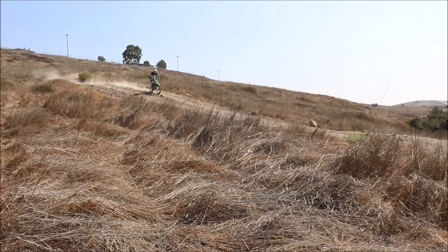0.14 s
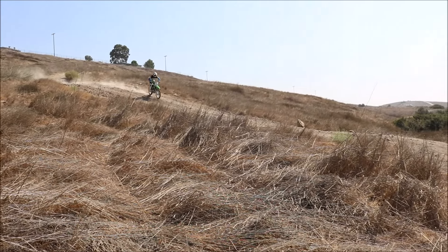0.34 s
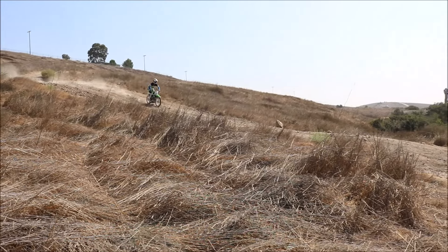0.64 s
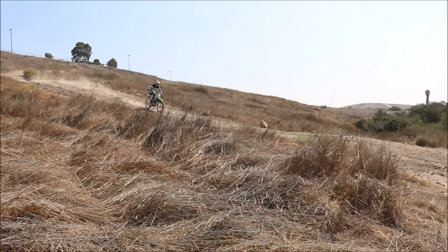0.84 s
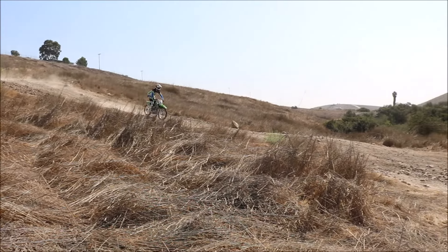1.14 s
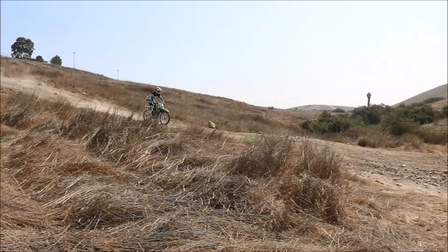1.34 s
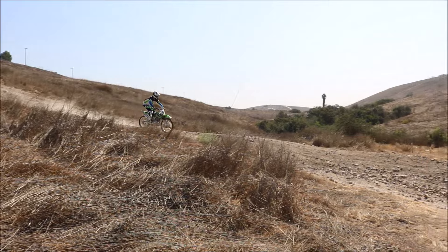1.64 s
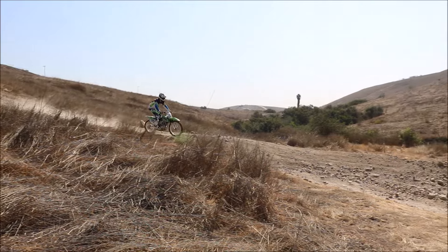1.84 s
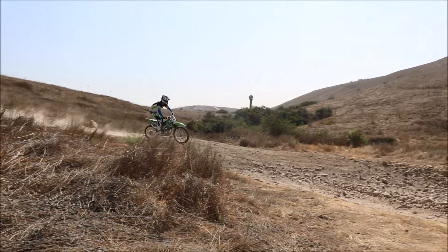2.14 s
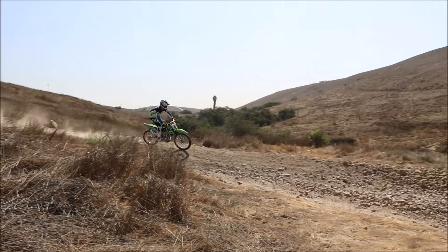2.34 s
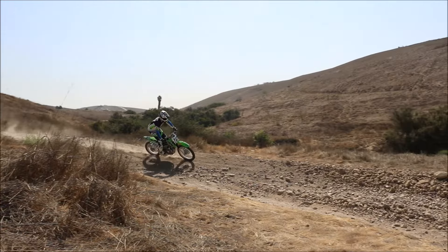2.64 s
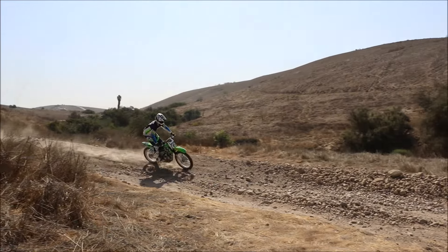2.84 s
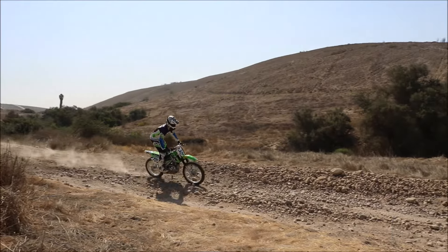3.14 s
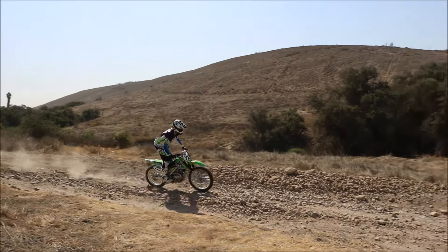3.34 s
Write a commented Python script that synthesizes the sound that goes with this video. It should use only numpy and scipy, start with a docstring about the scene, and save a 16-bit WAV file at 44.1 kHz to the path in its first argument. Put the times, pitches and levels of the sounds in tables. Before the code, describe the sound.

Motorbike engine coming down a dry open trail: droning far off, slowing into a lumpy popping burble with metallic clanks and stone spray, then a fuller throaty surge nearby; dry, centred, little background hiss.

```python
"""Trail bike down a stony slope

A single-cylinder bike rides down towards the listener: throttle open, shut with pops in the pipe, then open again.
Open exhaust is a stack of multiples of the firing rate; shut exhaust is uneven pulses ringing a pipe filter.
Clatter, gravel and treble are coloured noise that swells with each firing; stone sprays are short noise bursts.
Pops, clanks and chain ticks are damped sines, cracks are single snaps; a low rumble and a side hiss lie beneath."""
import sys
import numpy as np
from scipy import signal
from scipy.fft import rfft, irfft, next_fast_len
from scipy.io import wavfile
from scipy.ndimage import uniform_filter1d, map_coordinates

SR = 44100
rng = np.random.default_rng(int(sys.argv[2]) if len(sys.argv) > 2 else 0)


def wrap_up_sound(samples):
    """Save the sound to the file named by the first command line argument, as 16-bit audio."""
    columns = np.atleast_2d(samples).T
    # keep every value between -1 and 1, then stretch to whole-number steps
    tamed = np.clip(columns, -1, 1)
    steps = np.round(tamed * 32767).astype(np.int16)
    wavfile.write(sys.argv[1], SR, steps)


N = 154350  # length [samples]

# Hiss that differs between the channels, bass included: (frequency [Hz], level [dB])
HISS_COLOUR = [(12, -54), (20, -21), (48, -14), (91, -36), (158, -26), (285, -64), (4420, -65), (4810, -61),
               (8410, -42), (16000, -34)]
HISS_DB = -11  # over the treble curve
# Low rumble: (frequency [Hz], level [dB])
RUMBLE_COLOUR = [(12, -77), (20, -25), (32, -53), (59, -23.5), (80, -36.5), (100, -17), (180, -120)]
RUMBLE_DB = -45
# Rolling layers before bumps and beat:
# (time [s], clatter [dB], gravel [dB], treble [dB], top treble [dB])
ROLLING_LEVELS = [(0.0, -37.5, -58, -65, -74), (0.25, -38, -51.5, -62.5, -81),
                  (0.5, -38.5, -55, -61.5, -61), (0.61, -37.5, -48, -60.5, -70),
                  (0.75, -36.5, -50.5, -60, -76), (0.94, -37.5, -55.5, -62, -68),
                  (1.28, -38, -49.5, -61, -74), (1.68, -35.5, -49, -61, -65), (1.85, -34.5, -42, -55, -59),
                  (2.02, -37.5, -44, -57.5, -62), (2.24, -34.5, -43.5, -60.5, -61),
                  (2.48, -33, -48, -59, -68), (2.83, -33.5, -47, -59, -63), (2.95, -34, -47.5, -54, -58),
                  (3.1, -31.5, -41.5, -52.5, -54), (3.21, -30, -42, -51.5, -57),
                  (3.5, -35, -41, -56.5, -55)]
# Top treble: (frequency [Hz], level [dB])
TOP_TREBLE_COLOUR = [(7060, -18), (12000, 3), (15100, -5), (15700, -3)]
# Treble rush: (frequency [Hz], level [dB])
TREBLE_COLOUR = [(3530, -46), (6000, 0), (6360, -6.5), (7330, -7.5), (10700, -8), (12000, -13),
                 (15600, -43), (22000, -120)]
# Cooling-fin resonances: (frequency [Hz], width before sharpening [Hz], relative level [dB])
FIN_MODES = [(8160, 85, 12), (10770, 130, 5.5), (10700, 72, -11), (11940, 230, 4)]
# Tyres on gravel: (frequency [Hz], level [dB])
GRAVEL_COLOUR = [(1760, -16.5), (3000, 3), (3780, -5), (5010, -3), (5500, -3), (6260, -15.5), (7500, -27),
                 (9750, -42), (16500, -120)]
# Stones sprayed at the frame: (time [s], length scale [s], body level [dB], treble over body [dB])
STONE_SPRAYS = [(0.715, 0.014, -32, -5.5), (1.184, 0.043, -35, -28), (1.769, 0.027, -29, -7.5),
                (2.196, 0.0068, -24.5, -14), (2.618, 0.0089, -29, -16), (2.754, 0.015, -37.5, -1.5),
                (2.877, 0.019, -27.5, -2), (3.376, 0.01, -25.5, -8.5)]
# Spray body: (frequency [Hz], level [dB])
SPRAY_BODY_COLOUR = [(600, -10), (1500, 0.5), (3000, 2), (5000, -9.5), (7000, -27), (16000, -62)]
# Spray treble: (frequency [Hz], level [dB])
SPRAY_TREBLE_COLOUR = [(3000, -30), (5000, 0), (6500, -14), (10000, -18), (13000, -35), (16000, -47)]
# Metal clanks: (time [s], relative level [dB], frequency [Hz], 60 dB decay [s])
METAL_CLANKS = [(0.0413, -26, 1940, 0.02), (0.5871, -19, 2380, 0.019), (0.609, -18.5, 2240, 0.031),
                (0.7186, -20.5, 2880, 0.019), (0.7212, -24, 2340, 0.02), (1.2021, -11.5, 2730, 0.014),
                (1.2113, -14, 2493, 0.015), (1.2124, -31, 2730, 0.016), (1.2244, -24, 2230, 0.036),
                (1.3693, -21, 1710, 0.031), (1.4835, -23, 2140, 0.012), (1.6745, -21, 2120, 0.026),
                (1.7699, -13, 1850, 0.019), (1.7844, -20, 1660, 0.024), (1.8158, -15, 2220, 0.014),
                (1.8961, -17, 2210, 0.015), (1.9644, -19.5, 1747, 0.023), (2.0477, -21, 1382, 0.019),
                (2.1979, -7, 1613, 0.02), (2.2383, -22, 1780, 0.023), (2.2752, -6, 2300, 0.007),
                (2.3735, -21, 2640, 0.018), (2.4738, -24, 1310, 0.02), (2.4864, -17, 1740, 0.023),
                (2.5094, -14, 1690, 0.018), (2.5566, -17, 1520, 0.02), (2.5732, -11, 1270, 0.013),
                (2.5805, -12, 2440, 0.013), (2.6625, -18.5, 1950, 0.025), (2.7586, -11, 1734, 0.035),
                (2.921, -20, 1750, 0.02), (2.9711, -17.5, 1560, 0.026), (3.0101, -18, 1840, 0.04),
                (3.1303, -20, 1680, 0.018), (3.1587, -17.5, 1870, 0.022), (3.2086, -17, 1330, 0.019),
                (3.2311, -14, 2300, 0.015), (3.2705, -4, 2030, 0.0096), (3.2939, -16, 2122, 0.03),
                (3.3054, -18, 2220, 0.018), (3.3954, -28, 1950, 0.018), (3.4204, -18, 2330, 0.03)]
# Clatter, far with throttle open: (frequency [Hz], level [dB])
FAR_CLATTER_COLOUR = [(260, -38), (450, 2), (918, -6.5), (1100, -3.5), (1200, -5.5), (1930, -4), (2180, -9),
                      (2380, -2), (4500, -18.5), (5850, -54), (9900, -120)]
# Clatter, throttle shut: (frequency [Hz], level [dB])
SHUT_CLATTER_COLOUR = [(260, -21), (450, -2), (668, 1.5), (842, -8), (1060, -4), (1590, -6.5), (1910, -6.5),
                       (2210, -7), (4500, -22.5), (5850, -65), (9900, -120)]
# Clatter, near with throttle open: (frequency [Hz], level [dB])
NEAR_CLATTER_COLOUR = [(260, -29), (450, 3), (624, 3), (721, 4.5), (900, -3.5), (1170, 3), (1570, -3.5),
                       (2270, 0), (2830, -11.5), (3060, -13.5), (4500, -15.5), (5850, -48), (9900, -120)]
# Engine-casing resonances: (frequency [Hz], width before sharpening [Hz], relative level [dB])
CASING_MODES = [(1192, 59, -4.5), (1557, 62, 5.5), (2183, 41, 4.5), (1916, 97, -4), (2370, 63, 3.5),
                (2743, 90, -1.5), (3000, 90, -4.5), (3900, 100, -14)]
# Sharp snaps: (time [s], relative level [dB])
PRESSURE_CRACKS = [(.681, -16), (.7232, -15), (1.983, -16), (2.5727, -8), (2.5812, -9), (2.5847, -10),
                   (2.6085, -18), (2.973, -13)]
# Afterfire: (time [s], relative level [dB], frequency [Hz], 60 dB decay [s])
AFTERFIRE_POPS = [(0.593, -39, 1009, 0.019), (0.593, -19.5, 450, 0.04), (0.674, -36, 590, 0.022),
                  (0.68, -15, 557, 0.029), (0.7228, -25, 473, 0.056), (1.099, -23, 674, 0.024),
                  (1.294, -17, 573, 0.018), (1.356, -24, 522, 0.026), (1.503, -14.5, 480, 0.013),
                  (1.663, -22.5, 545, 0.033), (1.719, -26, 602, 0.045), (1.808, -19, 570, 0.018),
                  (1.836, -18, 646, 0.022), (1.877, -26, 1080, 0.023), (1.8975, -11, 493, 0.013),
                  (1.982, -16.5, 530, 0.025), (2.2, -27, 505, 0.027), (2.21, -16, 570, 0.02),
                  (2.299, -23, 580, 0.026), (2.315, -21.5, 578, 0.068), (2.3972, -14, 710, 0.022),
                  (2.432, -21.5, 760, 0.019), (2.496, -23, 688, 0.037), (2.509, -30, 626, 0.017),
                  (2.525, -26, 1036, 0.043), (2.565, -18, 840, 0.02), (2.6225, -21, 750, 0.029),
                  (2.63, -20, 690, 0.02), (2.637, -16.5, 673, 0.027), (2.755, -15, 525, 0.013),
                  (2.912, -14, 650, 0.013), (3.039, -20, 440, 0.035), (3.305, -23, 473, 0.028)]
# Uneven flow in the pipe: (frequency [Hz], level [dB])
BURBLE_COLOUR = [(60, -61), (140, -5.5), (200, -3), (350, -2), (450, -13), (700, -57.5)]
# Burble, rougher while shut: (time [s], level before wobble [dB])
BURBLE_LEVELS = [(0, -44), (.5, -44), (.7, -36), (1.1, -38), (1.6, -35), (2.1, -36), (2.33, -41),
                 (2.5, -36), (2.74, -36), (2.82, -40), (3.5, -36)]
# Firing and beat levels before the throttle trim:
# (time [s], firing rate [Hz], open-throttle beat [dB], shut-throttle beat [dB])
ENGINE_COURSE = [(0.0, 48.56, -40, -24), (0.18, 48.83, -35, -21.5), (0.36, 50.07, -32.5, -27),
                 (0.5, 49.15, -30, -27), (0.67, 44.76, -33.5, -31), (0.79, 46.12, -30, -30),
                 (1.03, 44.79, -27, -34.5), (1.14, 41.02, -32, -34), (1.25, 40.49, -30, -35.5),
                 (1.41, 41.53, -28, -31.5), (1.54, 39.28, -30, -29.5), (1.75, 35.78, -32.5, -22.5),
                 (1.96, 34.83, -30, -27), (2.07, 32.72, -32, -26.5), (2.15, 33.35, -31.5, -30.5),
                 (2.22, 33.12, -32, -32), (2.27, 29.96, -31, -32), (2.33, 29.86, -43, -33.5),
                 (2.4, 27.7, -28, -33), (2.5, 29.01, -35, -26), (2.61, 27.63, -41, -31.5),
                 (2.76, 27.32, -38, -30), (2.8, 27.62, -25, -25), (2.91, 36.51, -28.5, -50),
                 (2.95, 39.85, -26, -37), (3.02, 43.38, -26, -39), (3.1, 45.56, -24.5, -9.5),
                 (3.25, 45, -26, -18), (3.36, 42, -25, -40), (3.47, 44.6, -24.5, -30),
                 (3.5, 45.8, -24, -32)]
# Throttle trim on both beats: (time [s], open trim [dB], shut trim [dB])
THROTTLE_TRIM = [(0, 7.5, -9), (.5, -1, -2), (.7, -1.5, -0.5), (1.1, -4, 3.5), (1.6, -3, -4.5),
                 (2.1, -2.5, -0.5), (2.33, -4, 3), (2.5, 1, -1), (2.74, 6, 3.5), (2.8, 0.5, -9),
                 (2.86, 4.5, -14), (2.92, 5.5, -26), (3.05, 2, -13.5), (3.5, 1.5, -20)]
# Pipe resonance with the throttle shut: (frequency [Hz], level [dB])
SHUT_PIPE_COLOUR = [(30, -59), (70, -13), (100, -5.5), (120, 8), (140, -4.5), (170, -30), (210, -24),
                    (270, -14.5), (345, -8), (420, -39), (600, -15.5), (900, -59)]
# Open-throttle beat, far: (multiple of firing rate, level before wavering [dB])
FAR_MULTIPLES = [(1, -7), (2, -6), (3, 1.5), (4, -0.5), (5, -2), (6, -2), (7, -3.5), (8, -11.5), (9, -49)]
# Open-throttle beat, near: (multiple of firing rate, level before wavering [dB])
NEAR_MULTIPLES = [(1, -12), (2, 1), (3, -3), (4, -14.5), (5, -2), (6, -7), (7, -6.5), (8, -5.5), (9, -8),
                  (10, -21), (11, -12.5), (12, -31), (13, -24), (15, -21), (16, -22)]
# What softens clanks, pops and cracks: (frequency [Hz], gain [dB])
KNOCK_COLOUR = [(20, 5.5), (4000, 0), (7000, -20), (16000, -29)]

NEAR_S, NEARING_S = 2.55, 0.24  # middle and time constant of the far-to-near change [s]
SHUT_S, OPEN_S, TWIST_S = 0.63, 2.96, 0.025  # throttle shuts, reopens, time constant of a twist [s]
TICKS_PER_S = 160  # chain ticks
RASP_DB, RASP_S = -5, 0.012  # engine shake: level over the clatter curve, decay constant [s]
CRACK_S = 0.00018  # time constant of a snap [s]
FIRING_S = 2.95  # one firing lands here [s]
JITTER_CYCLES, SCATTER_DB = 0.008, 1.5  # shut-throttle spread of timing and size
RING_LEAD_S = 0.005  # shut throttle: the ring in the pipe builds ahead of the beat [s]
BASS_HZ = 50.5  # the pipe's mouth radiates little below this
FAR_BASS_HZ = 82  # the far beat loses its bass below this
# The silencer holds back the multiples between its resonance and its notch
SILENCER_HZ, SILENCER_WIDE_HZ, NOTCH_HZ, NOTCH_WIDE_HZ = 115, 40, 165, 30
SUCK_RAD = 1.0  # extra lag of every multiple: a dip comes before each peak
TOP_HZ = 15830  # band limit of the output


def amp(db):
    """dB to gain."""
    return 10 ** (np.asarray(db) / 20)


def unit(x):
    """Scaled to rms 1."""
    return x / np.sqrt(np.mean(x ** 2) + 1e-20)


def curves(rows):
    """One value per sample for each column after the time."""
    s, *cols = np.transpose(rows)
    return [np.interp(np.arange(N) / SR, s, c) for c in cols]


def wobble(rate):
    """A smooth random curve, rate knots a second."""
    knots = rng.standard_normal(int(N * rate / SR) + 4)
    return map_coordinates(knots, [np.arange(N) * rate / SR])


def colour(x, points):
    """Causal minimum-phase filter through the (frequency [Hz], level [dB]) points."""
    m = 2 * next_fast_len(len(x) // 2 + SR // 4)
    f, db = np.transpose(points)
    bins = np.fft.rfftfreq(m, 1 / SR)
    gain = amp(np.interp(np.log(bins + 1), np.log(f + 1), db))
    # folding the cepstrum makes the response causal
    cepstrum = irfft(np.log(gain + 1e-6), m)
    cepstrum[1:m // 2] *= 2
    cepstrum[m // 2 + 1:] = 0
    return irfft(rfft(x, m) * np.exp(rfft(cepstrum)), m)[:len(x)]


def noise(points):
    """Coloured noise of rms 1."""
    return unit(colour(rng.standard_normal(N), points))


def patchy(points, patchy_db):
    """Coloured noise of rms 1 with random gain patches across time and frequency."""
    z = signal.stft(noise(points), nperseg=512)[2]
    field = uniform_filter1d(rng.standard_normal(z.shape), size=5, axis=0)
    field = uniform_filter1d(field, size=12, axis=1)
    return unit(signal.istft(z * amp(patchy_db * unit(field)), nperseg=512)[1][:N])


def humming(modes, sharp):
    """Noise of rms 1 through narrow resonances; sharp divides their widths."""
    f = np.fft.rfftfreq(N, 1 / SR)
    gain = sum(amp(db) / (1 + (2 * sharp * (f - hz) / width) ** 2) for hz, width, db in modes)
    return unit(irfft(rfft(rng.standard_normal(N)) * gain, N))


def rings(rows, attack_s, rasp, upper):
    """Damped sines with wandering phase, each with an upper mode 1.3 to 1.8 times as high."""
    s, db, hz, t60 = np.transpose(rows)[:, :, None]
    t = np.arange(SR // 20) / SR
    walk = rng.standard_normal((len(s), len(t))).cumsum(1)
    drift = uniform_filter1d(walk, size=12, axis=1) * rasp * np.sqrt(hz / SR)
    phase = 2 * np.pi * hz * t + drift
    ratio = 1.3 + 0.5 * rng.random(hz.shape)
    wave = np.sin(phase) + upper * np.sin(ratio * phase)
    wave = wave * amp(db - 60 * t / np.maximum(t60, 0.002)) * (1 - np.exp(-t / attack_s))
    at = (s * SR).astype(int) + np.arange(len(t))
    return np.bincount(at.ravel(), wave.ravel(), N + SR)[:N]


def nearness():
    """From 0, far up the slope, to 1, close by."""
    return 1 / (1 + np.exp((NEAR_S - np.arange(N) / SR) / NEARING_S))


def by_throttle(make):
    """A layer made in the far, shut and near colours, cross-faded at equal power."""
    t = np.arange(N) / SR
    far = 1 / (1 + np.exp((t - SHUT_S) / TWIST_S))
    near = 1 / (1 + np.exp((OPEN_S - t) / TWIST_S))
    shut = np.abs(1 - far - near)
    layer = np.sqrt(far) * make(FAR_CLATTER_COLOUR)
    layer = layer + np.sqrt(shut) * make(SHUT_CLATTER_COLOUR)
    return layer + np.sqrt(near) * make(NEAR_CLATTER_COLOUR)


def firing_cycle():
    """Firing rate [Hz] and the running count of firings, integrated from that rate."""
    hz = curves(ENGINE_COURSE)[0]
    turn = np.cumsum(hz) / SR
    return hz, turn - turn[int(FIRING_S * SR)]


def side_hiss():
    """Faint wavering noise that follows the treble curve."""
    treble_db = curves(ROLLING_LEVELS)[2]
    return amp(HISS_DB + treble_db + 1.1 * wobble(8.25)) * noise(HISS_COLOUR)


def rumble():
    """Steady low noise."""
    return amp(RUMBLE_DB) * noise(RUMBLE_COLOUR)


def treble_rush(bumps, beat):
    """Bright noise pulsing with the firings, faint fin ringing while far; the top pulses only when near."""
    _, _, treble_db, top_db = curves(ROLLING_LEVELS)
    fins = amp(-32) * (1 - nearness()) ** 3 * humming(FIN_MODES, sharp=3.1)
    treble = amp(treble_db) * (patchy(TREBLE_COLOUR, patchy_db=1.6) + fins)
    top_beat = 1 + nearness() * (beat - 1)
    top = top_beat * amp(top_db) * noise(TOP_TREBLE_COLOUR)
    return amp(1.8 * bumps) * (beat * treble + top)


def gravel(bumps, beat):
    """Tyres on stones: patchy noise, uneven with the bumps and pulsing with the engine."""
    gravel_db = curves(ROLLING_LEVELS)[1]
    return amp(gravel_db + 0.62 * bumps) * beat * patchy(GRAVEL_COLOUR, patchy_db=3.0)


def stone_sprays():
    """Stones at the frame: short gritty wide-band noise bursts with a fast rise and rounded fall."""
    t, low, high = np.arange(N) / SR, np.zeros(N), np.zeros(N)
    for s, length, db, treble_db in STONE_SPRAYS:
        u = np.clip((t - s) / length, 0, 50)
        shape = (1 - np.exp(-12 * u)) * np.exp(-1.2 * u ** 2)
        low += amp(db) * shape
        high += amp(db + treble_db) * shape
    low, high = uniform_filter1d([low, high], size=40, axis=1)
    grit = amp(2.2 * wobble(300))
    return grit * (low * noise(SPRAY_BODY_COLOUR) + high * noise(SPRAY_TREBLE_COLOUR))


def clanks():
    """Metal knocking over bumps: short, quickly struck damped sines."""
    return amp(-2.5) * rings(METAL_CLANKS, attack_s=0.00071, rasp=0.74, upper=0.22)


def chain_ticks():
    """Randomly timed tiny rings, 700 to 2800 Hz, rms 1 overall."""
    draw = rng.random((int(TICKS_PER_S * N / SR), 4))
    s = draw[:, 0] * N / SR
    db = -2.5 * np.log(draw[:, 1] + 0.02)
    hz = 700 * 4 ** draw[:, 2]
    t60 = 0.003 + 0.008 * draw[:, 3]
    return unit(rings(np.c_[s, db, hz, t60], attack_s=0.0002, rasp=1.0, upper=0.96))


def engine_rasp(phase):
    """Every firing shakes the engine the same way: one decaying noise burst repeated each cycle."""
    t = np.arange(SR // 20) / SR
    shake = rng.standard_normal(len(t)) * np.exp(-t / RASP_S) * np.minimum(t / 0.003, 1)
    firings = np.diff(phase, prepend=0) < -0.5
    shakes = signal.fftconvolve(firings, shake)[:N]
    return by_throttle(lambda points: unit(colour(shakes, points)))


def clatter(bumps, beat, phase):
    """Mechanical noise and casing ringing that beat with the engine, plus rasp and chain ticks."""
    clatter_db = curves(ROLLING_LEVELS)[0]
    body = amp(-1.5) * by_throttle(lambda points: patchy(points, patchy_db=1.0))
    body = body + amp(-12.5 + 3.05 * wobble(5.96)) * humming(CASING_MODES, sharp=3.8)
    mixed = beat * body + amp(RASP_DB) * engine_rasp(phase) + amp(-9.5) * chain_ticks()
    return amp(clatter_db + bumps) * mixed


def cracks():
    """Single pressure snaps: a fast rise, then a swing below zero that dies away."""
    out, u = np.zeros(N + SR), np.arange(200) / SR / CRACK_S
    snap = np.e * u * (1 - u / 3) * np.exp(-u)
    for s, db in PRESSURE_CRACKS:
        out[round(s * SR):][:len(u)] += amp(db) * snap
    return out[:N]


def afterfire_pops():
    """Pops in the pipe: damped sines with a soft attack."""
    return amp(3.0) * rings(AFTERFIRE_POPS, attack_s=0.0013, rasp=0.9, upper=0.24)


def burble():
    """Uneven flow in the pipe: low wavering noise."""
    return amp(curves(BURBLE_LEVELS)[0] + 1.5 * wobble(30)) * noise(BURBLE_COLOUR)


def shut_beat(hz, turn):
    """Throttle shut: firings uneven in time and size ring the pipe."""
    level_db, trim_db = curves(ENGINE_COURSE)[2], curves(THROTTLE_TRIM)[1]
    at = np.flatnonzero(np.diff(np.floor(turn)) > 0)
    timing, size = rng.standard_normal((2, len(at)))
    shift = (timing * JITTER_CYCLES * SR / hz[at] - RING_LEAD_S * SR).astype(int)
    pulses = np.zeros(N)
    pulses[np.clip(at + shift, 0, N - 1)] = amp(SCATTER_DB * size) / hz[at]
    return amp(level_db + trim_db) * unit(colour(pulses, SHUT_PIPE_COLOUR))


def silencer_phase(f):
    """Phase [rad] of the silencer's resonance and notch at f [Hz], less the common lag."""
    notch = NOTCH_HZ ** 2 - f * f + 1j * f * NOTCH_WIDE_HZ
    resonance = SILENCER_HZ ** 2 - f * f + 1j * f * SILENCER_WIDE_HZ
    return np.angle(notch / resonance) - SUCK_RAD


def stack(multiples, hz, turn):
    """Multiples of the firing rate lined up into one beat, phased by the silencer, each wavering."""
    total = np.zeros(N)
    for k, db in multiples:
        phase = 2 * np.pi * k * turn + silencer_phase(k * hz) + 0.2 * wobble(12)
        total += amp(db + 1.7 * wobble(14)) * np.cos(phase)
    return unit(total)


def open_beat(hz, turn):
    """Throttle open: a clean stack of multiples, moving from the far to the near balance."""
    level_db, trim_db = curves(ENGINE_COURSE)[1], curves(THROTTLE_TRIM)[0]
    far_cut = signal.butter(2, FAR_BASS_HZ, "high", fs=SR, output="sos")
    mouth = signal.butter(2, BASS_HZ, "high", fs=SR, output="sos")
    near = stack(NEAR_MULTIPLES, hz, turn)
    far = signal.sosfiltfilt(far_cut, stack(FAR_MULTIPLES, hz, turn))
    beat = (1 - nearness()) * far + nearness() * near
    return signal.sosfilt(mouth, amp(level_db + trim_db) * beat)


def scene():
    """The bike reaches both channels alike; the faint hiss is opposite in the two."""
    hz, turn = firing_cycle()
    phase = turn % 1
    bumps = 0.48 * wobble(14) + 0.81 * wobble(40.34)  # unevenness shared by the rolling layers
    beat = 1 + 0.55 * uniform_filter1d(np.exp(-5 * phase), size=60)  # swell at each firing
    rolling = treble_rush(bumps, beat) + gravel(bumps, beat) + clatter(bumps, beat, phase)
    knocks = colour(clanks() + cracks() + afterfire_pops(), KNOCK_COLOUR)
    exhaust = burble() + shut_beat(hz, turn) + open_beat(hz, turn)
    mid = rumble() + rolling + stone_sprays() + knocks + exhaust
    side = side_hiss()
    return np.array([mid + side, mid - side])


def record(dry):
    """Cuts everything above the band limit."""
    m = next_fast_len(N + SR // 2)
    keep = np.fft.rfftfreq(m, 1 / SR) < TOP_HZ
    return irfft(rfft(dry, m) * keep, m)[:, :N]


dry = scene()
out = record(dry)
wrap_up_sound(out)
```